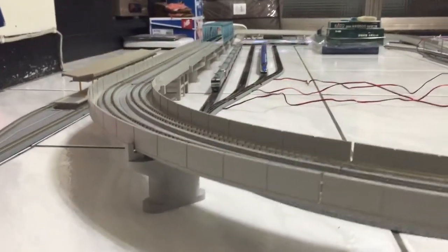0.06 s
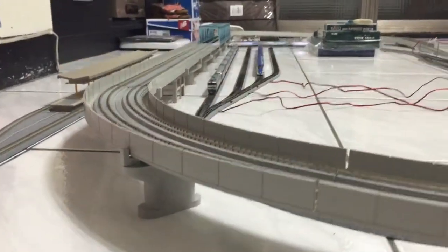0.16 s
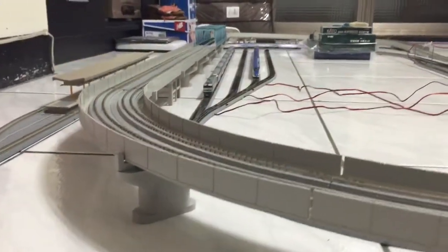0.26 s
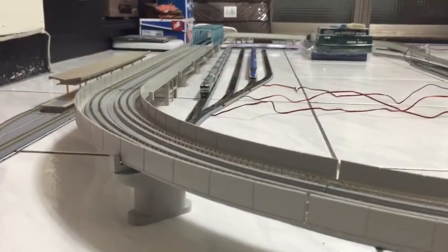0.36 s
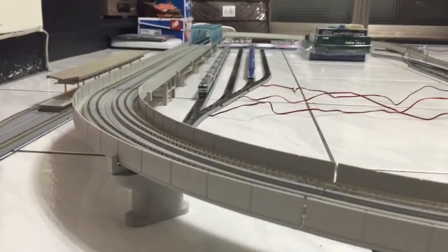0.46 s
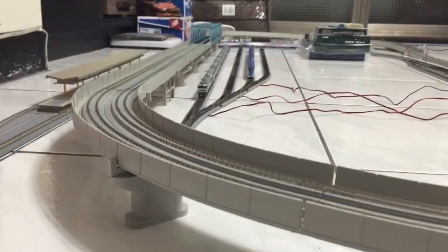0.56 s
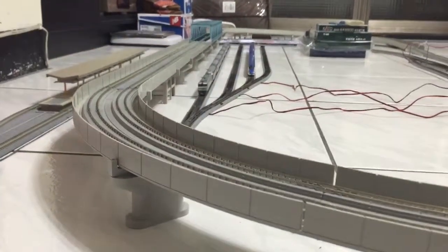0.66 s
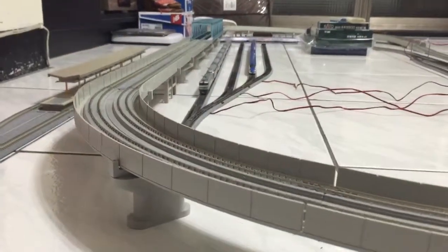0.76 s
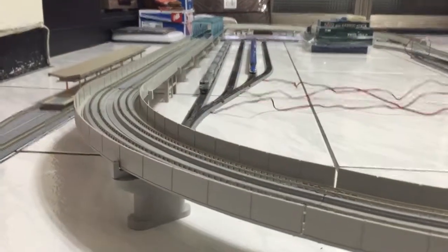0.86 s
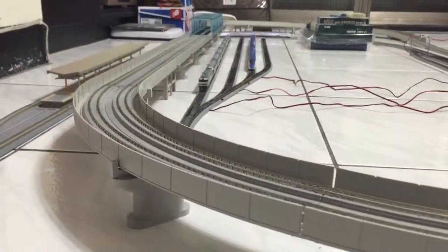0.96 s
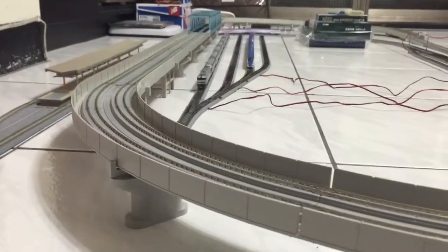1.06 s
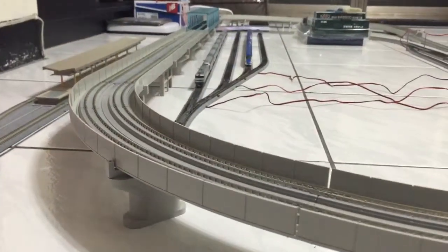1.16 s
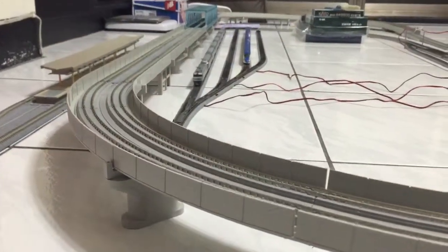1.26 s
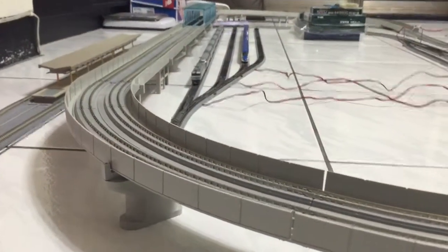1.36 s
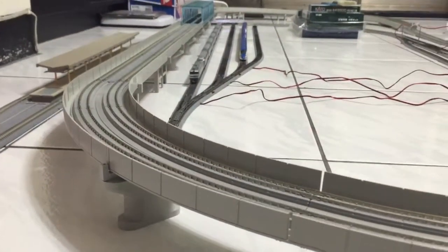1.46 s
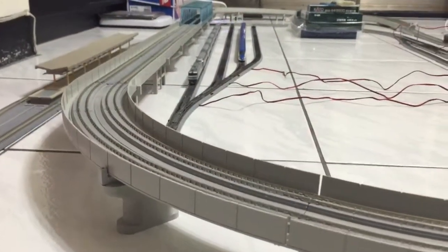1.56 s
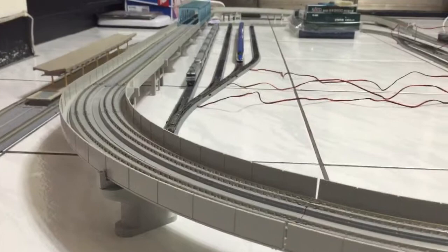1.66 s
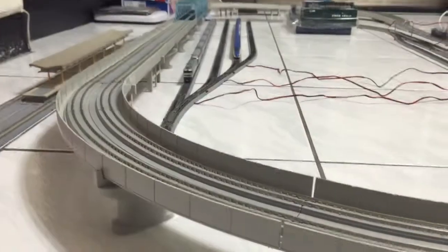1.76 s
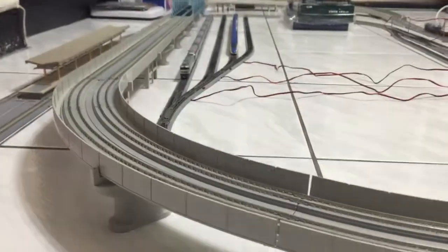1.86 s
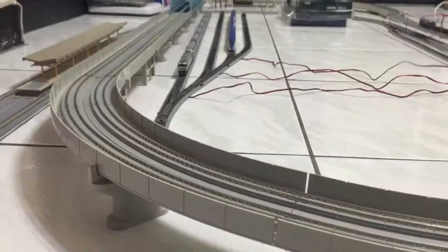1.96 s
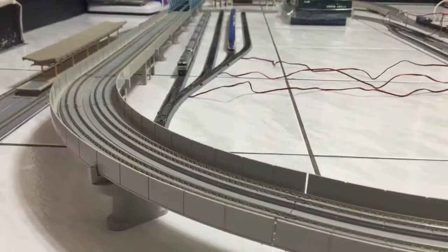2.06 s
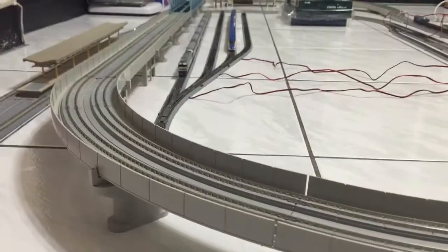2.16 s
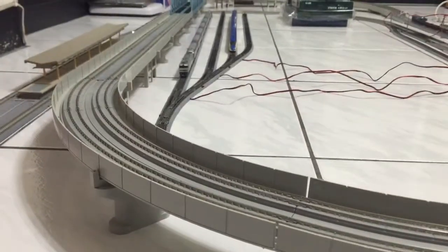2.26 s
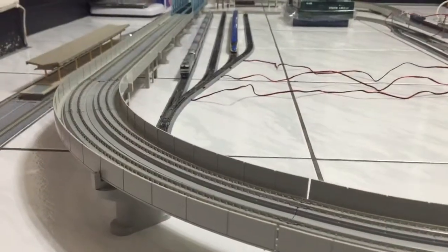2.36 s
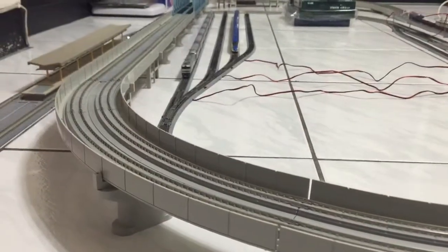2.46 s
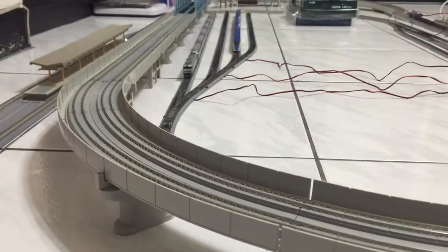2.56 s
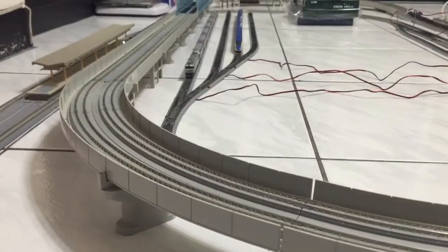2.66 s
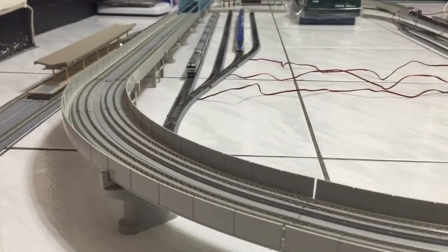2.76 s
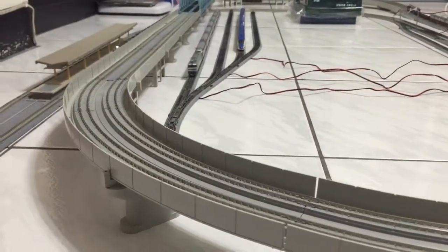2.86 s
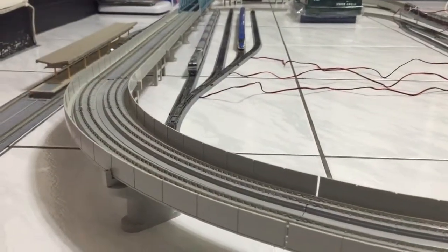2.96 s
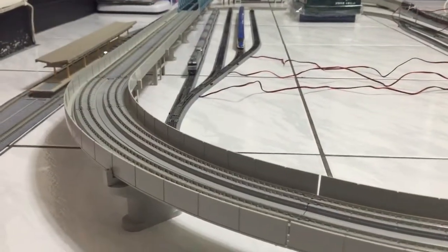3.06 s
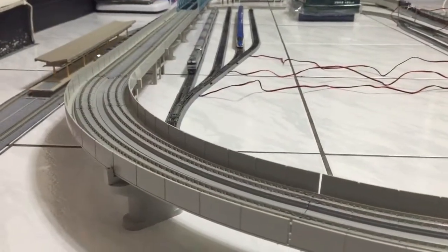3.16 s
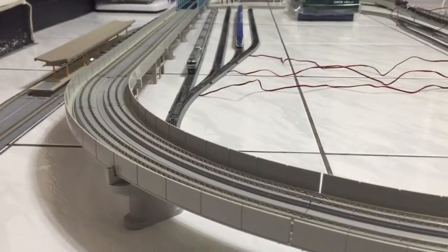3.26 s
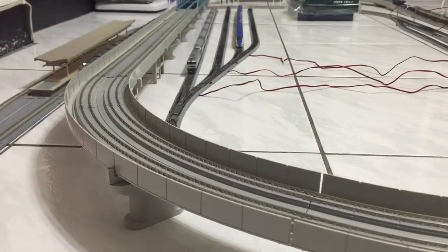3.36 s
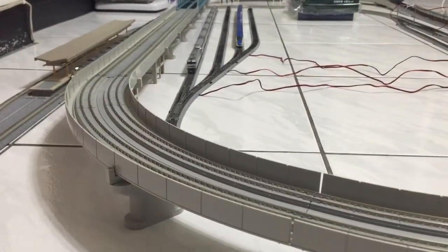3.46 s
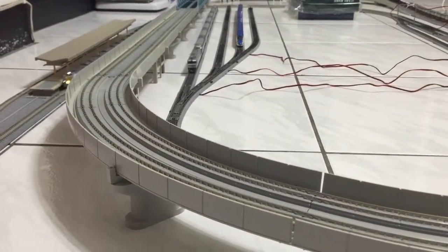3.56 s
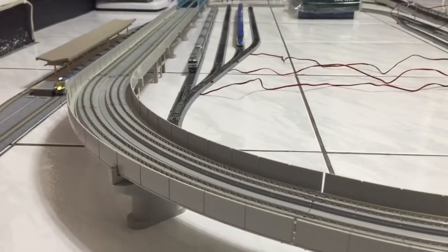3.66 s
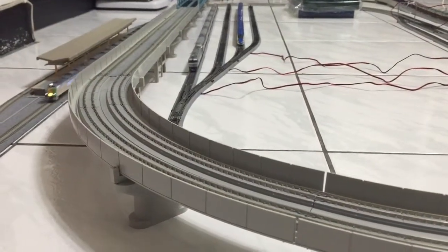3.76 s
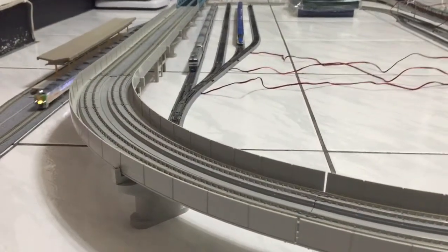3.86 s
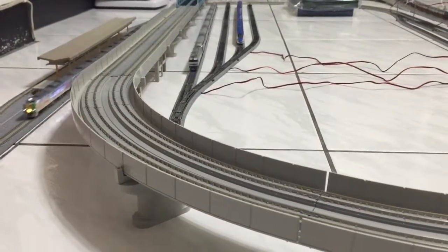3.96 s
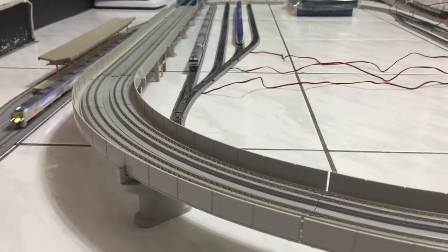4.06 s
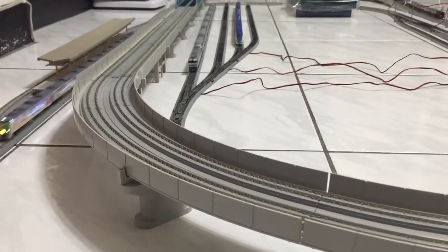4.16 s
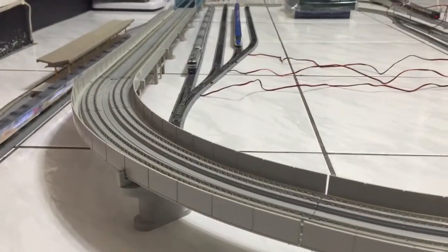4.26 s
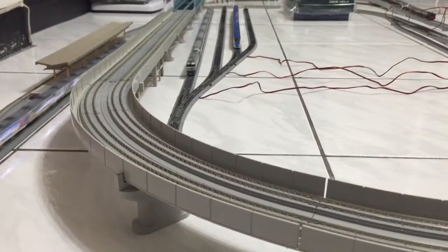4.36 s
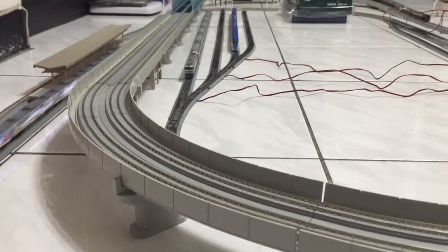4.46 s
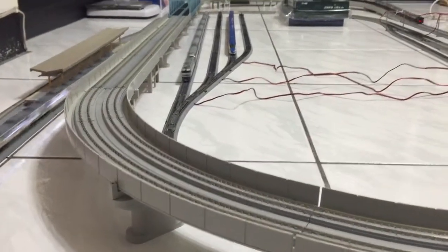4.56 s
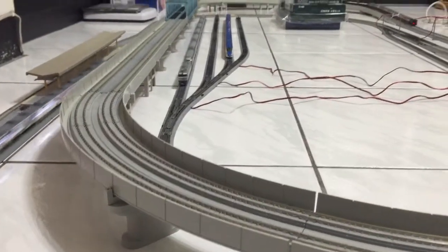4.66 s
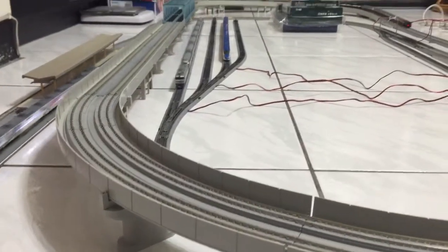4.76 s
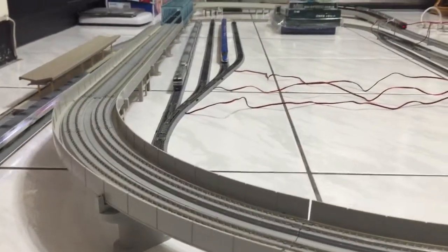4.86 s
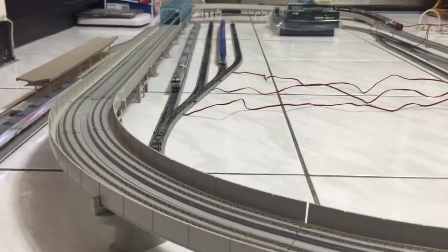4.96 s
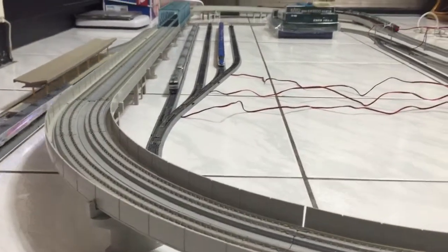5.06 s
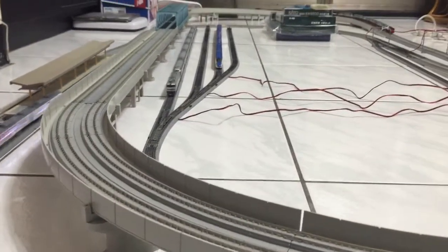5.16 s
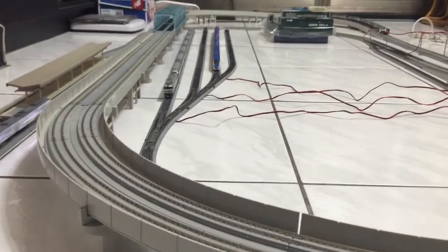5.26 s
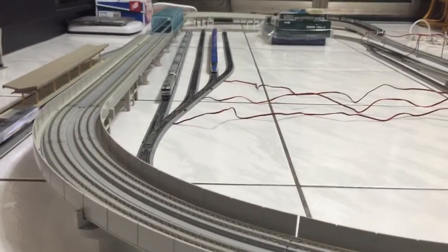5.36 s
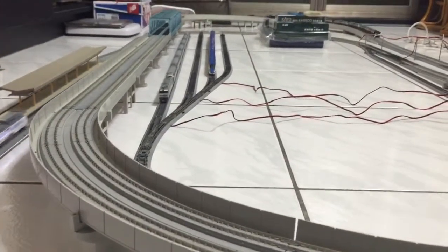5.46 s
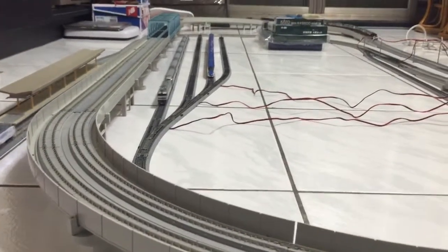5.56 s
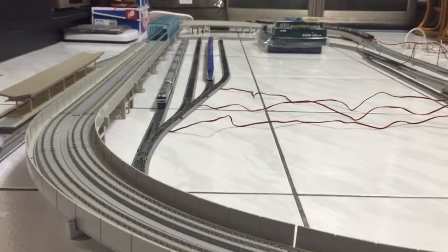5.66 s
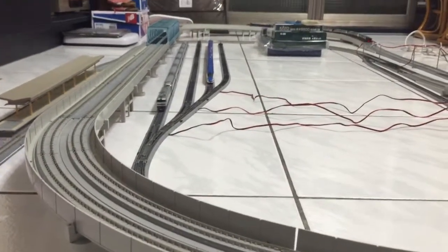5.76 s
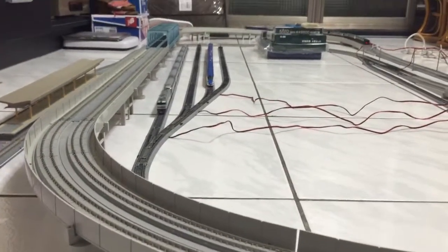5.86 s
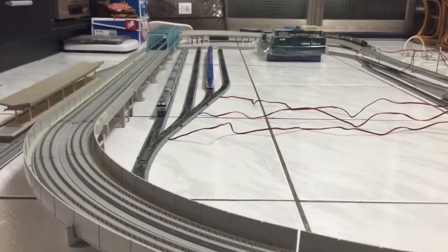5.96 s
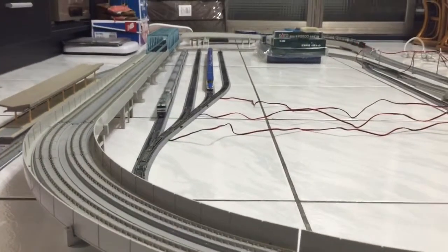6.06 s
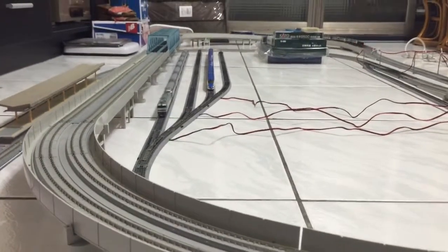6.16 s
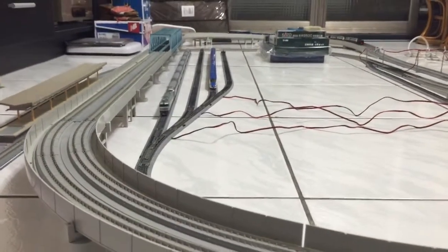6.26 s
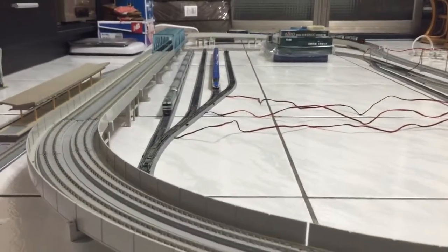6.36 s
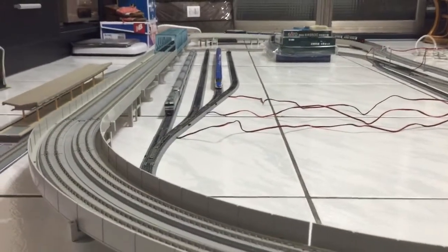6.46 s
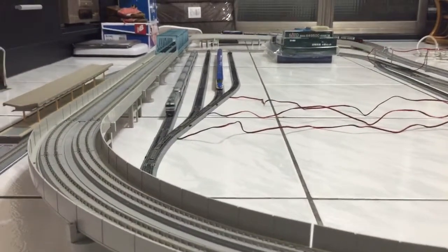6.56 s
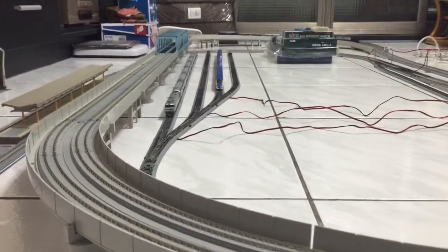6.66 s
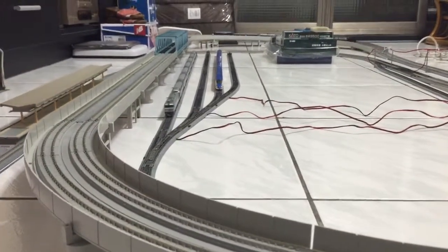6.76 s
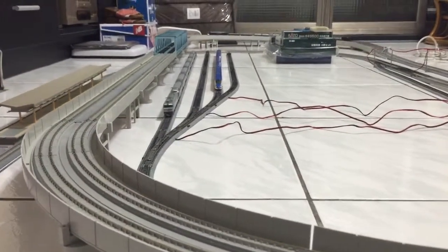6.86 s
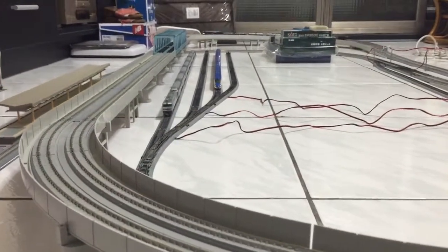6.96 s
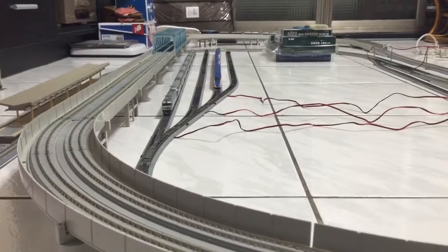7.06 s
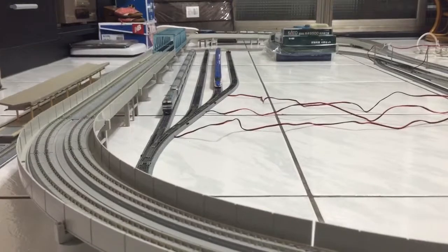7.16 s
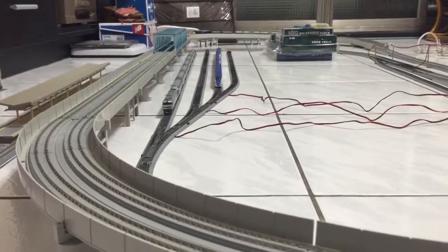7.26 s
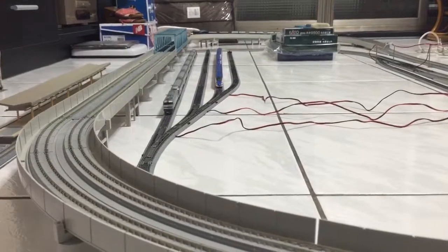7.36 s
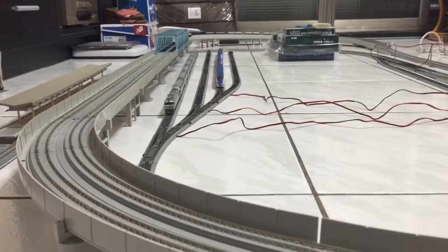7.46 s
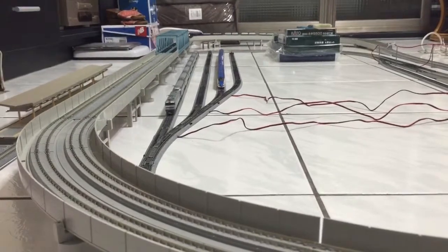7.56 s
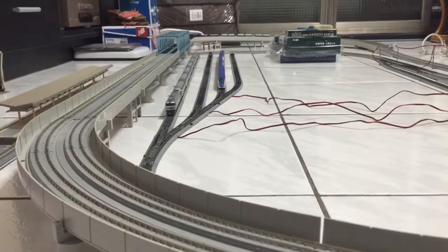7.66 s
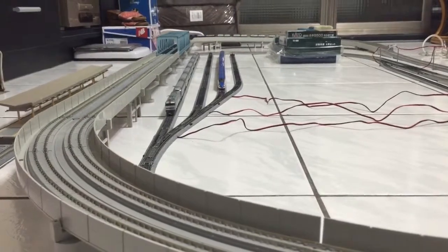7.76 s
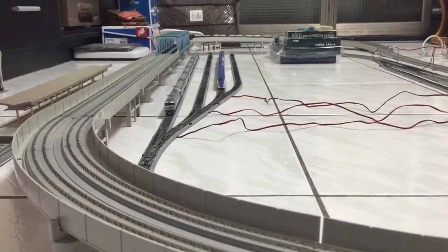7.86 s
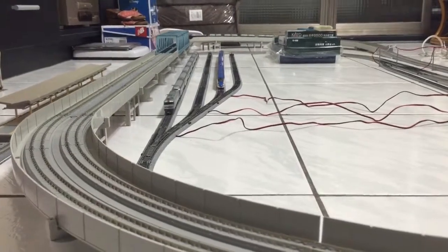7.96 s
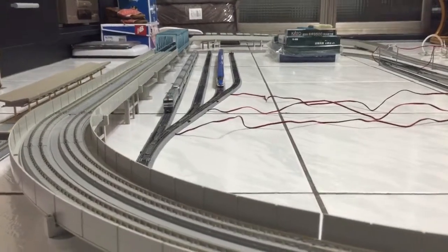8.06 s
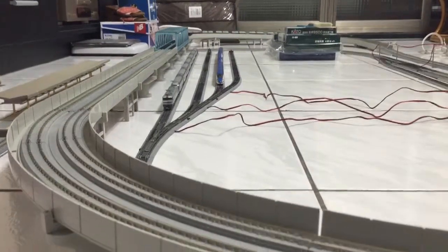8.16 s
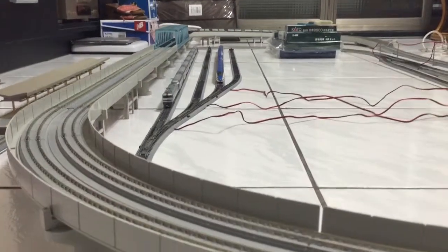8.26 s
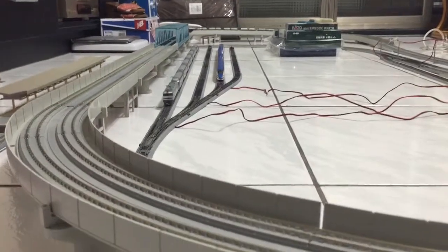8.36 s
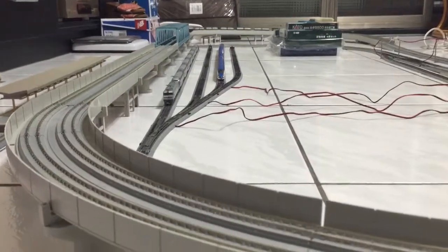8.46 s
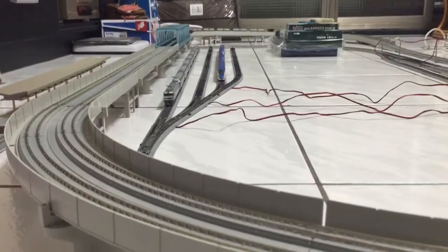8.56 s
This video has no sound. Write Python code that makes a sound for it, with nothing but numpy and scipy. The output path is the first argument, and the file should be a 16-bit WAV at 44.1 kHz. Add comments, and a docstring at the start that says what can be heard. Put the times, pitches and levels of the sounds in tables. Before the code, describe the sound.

Indoors, over a low steady hum and rumble, a model train rolls along with a fine whirring hiss and occasional clicks. Its wheels ring thinly through the bends as it grows louder. Nearest the microphone beside the track, the little cars chatter, the wheels tick crisply over joints and the plastic track pieces knock softly on the tiled floor. The sound eases slightly at the end.

```python
"""A small model train on a plastic track on a tiled floor, heard from one microphone close to the rails.
From the start a compressor hums in the room and the train runs some way off: tiny wheels patter on the
rails and ring the cars and the hollow track bed, pickups hiss, flanges sing in the curves.
From about 4 s it draws near. Around 7 s it is closest, with sharp ticks at the rail joints, rattling
cars and knocking track pieces. In the last second it starts to move off."""
import sys
import numpy as np
from scipy import signal
from scipy.fft import rfft, irfft
from scipy.io import wavfile

SR = 44100
rng = np.random.default_rng(int(sys.argv[2]) if len(sys.argv) > 2 else 0)


def waveform_to_disk(signal):
    """Save audio, clipped to [-1, 1], as 16-bit WAV at the path in sys.argv[1]."""
    frames = np.transpose(np.atleast_2d(signal))
    scaled = np.clip(frames, -1, 1) * 32767
    samples = np.round(scaled).astype(np.int16)
    wavfile.write(sys.argv[1], SR, samples)


N = 379260
TIME = np.arange(N) / SR
FREQS = np.fft.rfftfreq(N, 1 / SR)

# Levels are relative within each table; the functions set the balance between layers.
# spectra of the room's low rumble and its rush of air: f/Hz, level/dB
RUMBLE_COLOUR = [(50, -27), (78, -8), (100, -6), (122, 0.5), (138, -0.5), (152, -12.5), (168, -2.5),
                 (205, -19), (300, -21.5), (500, -42)]
AIR_COLOUR = [(20, -16), (45, -10), (70, 4), (100, -5.5), (165, -9.5), (210, -11.5), (300, -19.5),
              (550, -22.5), (1500, -26), (8000, -33.5)]
# swell of the rumble: t/s, level/dB
RUMBLE_LEVEL = [(0, -59), (.22, -65), (.38, -59), (.6, -57), (.85, -70), (1.03, -60), (1.4, -60.5),
                (2.1, -69), (2.35, -61.5), (3.1, -62), (3.75, -60.5), (4.0, -66), (4.2, -60), (4.7, -68),
                (5.3, -66), (5.7, -63.5), (6.5, -65), (7.1, -59), (8.0, -66.5), (8.5, -63)]
# compressor and fan tones: f/Hz, level/dB
HUM_TONES = [(59.2, -53.5), (86.1, -65), (120, -73), (177.8, -71), (237.2, -71.6), (296.1, -87),
             (355.3, -89), (414.5, -91), (533, -94)]
# the hum's upper tones change as the microphone moves: t/s, level/dB
HUM_UPPER = [(0, 0), (.5, -1), (.75, -5), (2.1, -4), (2.7, 1), (3.5, 1.5), (4.3, -.3), (8.6, .5)]
# the motor gathers speed, then sags under load: t/s, f/Hz, level/dB
MOTOR_WHINE = [(0, 693, -84), (.6, 724, -85), (1.4, 734, -82), (1.75, 745, -93), (2.1, 747, -81),
               (2.45, 735, -91), (2.8, 710, -84), (3.05, 705, -91), (3.4, 700, -87), (3.8, 720, -100),
               (4.4, 751, -81), (5.2, 735, -85), (5.75, 654, -82), (8.6, 625, -94)]
# cars cross a droning track piece: middle t/s, length/s, level/dB
DRONES = [(5.95, .4, -82), (7.0, 0.62, -75), (7.482, .13, -71), (8.1, 0.57, -81)]
# track pieces tip under the weight: t/s, level/dB, f/Hz
KNOCKS = [(0.071, -57, 487), (0.574, -61, 751), (1.335, -61, 740), (2.374, -59, 516), (3.372, -60, 600),
          (3.559, -62, 560), (3.922, -60, 450), (6.002, -55, 428), (6.107, -58, 650), (6.535, -55, 738),
          (6.599, -62, 430), (6.833, -56, 427), (6.87, -55, 789), (6.921, -56, 685), (7.169, -63, 600),
          (7.301, -53, 776), (7.451, -52, 743), (7.639, -60, 600), (7.668, -57, 580), (8.002, -59, 397),
          (8.154, -58, 700), (8.472, -54, 367)]
# modes of the hollow car bodies: f/Hz, t60/s, level/dB
CAR_MODES = [(943, 0.064, -7), (1070, 0.083, -2.5), (1187, 0.052, -0.5), (1323, .05, 1.5), (1450, .05, -2),
             (1610, .06, 4)]
# wheels strike rail joints: t/s, level/dB
JOINTS = [(0.1594, -31), (0.3694, -27), (1.7644, -31), (2.4094, -31), (2.7989, -29), (4.5994, -22),
          (4.9294, -24), (5.2894, -19), (6.0294, -27), (6.3094, -21), (6.6744, -17), (6.693, -20),
          (6.882, -13), (7.3014, -25), (7.3087, -12), (7.5073, -23), (7.7238, -23), (8.0054, -17),
          (8.0594, -22), (8.1214, -24)]
# cars shudder over rough spots: middle t/s, length/s, level/dB
RATTLES = [(.15, 0.046, -46), (.296, .05, -41.5), (0.365, .06, -43), (.603, .06, -44), (1.764, 0.051, -49),
           (2.42, .07, -44.5), (2.81, 0.048, -44), (3.008, 0.076, -43.5), (4.744, 0.11, -44),
           (5.11, .04, -38), (5.37, .07, -39), (5.447, 0.052, -44), (5.77, 0.1, -37.5), (5.864, .05, -40),
           (5.936, .05, -38), (6.008, .05, -37), (6.25, .05, -40), (6.311, .07, -37), (6.44, .06, -41),
           (6.676, 0.041, -33), (6.852, .08, -37), (7.144, .05, -38), (7.31, 0.027, -36), (7.45, .07, -40),
           (7.735, 0.048, -36), (7.912, 0.054, -39), (7.98, .06, -41), (8.117, .05, -41)]
# wheels and track sing in curves: middle t/s, length/s, f/Hz, half width/Hz, level/dB
FLANGE_SONG = [(.2, 0.56, 3150, 400, -51), (.37, .3, 1205, 45, -58.5), (.72, 0.67, 2715, 50, -48),
               (1.7, 0.34, 2610, 90, -44), (2.5, 2.7, 2440, 150, -45.5), (2.25, 0.92, 1630, 60, -55),
               (2.95, .5, 1636, 50, -52), (3.547, .35, 940, 35, -65), (3.6, 0.35, 2476, 70, -49),
               (4.1, .54, 6780, 169, -46), (4.51, .3, 1808, 50, -52), (4.7, 1.6, 3845, 330, -41),
               (4.73, .3, 2790, 50, -43), (4.782, 0.73, 3320, 150, -38.5), (5.1, 0.64, 6850, 190, -44.5),
               (5.0, .45, 8550, 200, -46), (5.35, 0.9, 2830, 70, -43.5), (5.76, 0.19, 1722, 50, -45),
               (5.9, .32, 2380, 130, -39.5), (6.0, .45, 1981, 50, -43), (6.2, 0.65, 3075, 130, -38),
               (6.19, 0.34, 3380, 60, -45), (6.26, 0.31, 1554, 45, -43), (6.48, .35, 947, 35, -56.5),
               (6.69, 0.32, 3020, 70, -36), (6.74, 0.27, 3180, 70, -36), (6.69, .25, 3380, 70, -39),
               (6.724, 0.29, 1593, 50, -41), (6.78, .5, 6260, 110, -44), (6.794, 0.27, 1076, 45, -51),
               (6.8, 2.3, 2350, 130, -42.5), (7.0, 0.85, 1965, 50, -43.5), (7.3, 1.5, 3075, 35, -40.5),
               (7.52, 0.62, 2200, 70, -41), (7.85, .5, 6350, 110, -50), (8.25, 1, 3770, 300, -41.5),
               (8.36, 0.37, 4349, 80, -43), (8.5, 0.56, 1190, 50, -50.5)]
# spectra of a track knock, a coupler clack, a joint tick and a rattle: f/Hz, level/dB
KNOCK_COLOUR = [(150, -14), (300, -2), (430, -6), (650, 3), (900, -10), (1600, -22)]
CLACK_COLOUR = [(600, -37), (1500, -5.5), (3200, 2), (6000, -5), (9000, -1.5), (15000, -10)]
TICK_COLOUR = [(600, -33), (1500, 4), (3000, 6), (6000, -5), (15000, -19)]
RATTLE_COLOUR = [(700, -37), (1200, -15.5), (1650, -8), (2400, 1.5), (3100, 4), (4300, -4), (5200, -7),
                 (15000, -26)]
# spectra of the rolling cars, track bed, hollow drumming and pickup hiss: f/Hz, level/dB
CARS_COLOUR = [(500, -44.5), (1200, -24), (1900, -6), (2400, -2), (3100, 0), (3700, -2), (4400, -4),
               (5200, -10), (7000, -14.5), (15000, -42)]
BED_COLOUR = [(500, -42.5), (1000, -23.5), (1280, -9), (1580, -2), (2000, -3.5), (2600, -16), (4500, -32)]
DRUM_COLOUR = [(250, -17), (430, -30), (520, -34), (690, -24), (830, -10.5), (950, -3.5), (1170, 2),
               (1400, 1), (2200, -28.5)]
HISS_COLOUR = [(2000, -34.5), (4200, 0), (5400, 0.5), (6800, -0.5), (8500, -3), (9800, -6.5), (11500, -9),
               (15300, -13)]
# highest treble of the hiss: t/s, level/dB
HISS_SHEEN = [(0, -.5), (.5, 1.2), (1.8, 2), (2.9, 1.5), (3.5, -0.5), (4.8, 1.5), (5.8, 2), (6.9, -1.5),
              (7.6, -1), (8.6, -3)]
# the train nears the microphone and moves off: t/s, cars/dB, bed/dB, drumming/dB, hiss/dB
PASS_BY = [(0.0, -40.0, -53, -68, -43), (0.35, -40.5, -56, -69, -44.0), (0.6, -41.3, -56, -62.5, -43.8),
           (1.5, -43.0, -57.5, -69.5, -43.5), (2.1, -43, -57.5, -74, -42.5), (2.7, -43.5, -53, -74, -43),
           (3.2, -43.0, -53.5, -67.5, -43), (3.7, -41.5, -48.5, -61.5, -42.5),
           (4.4, -40, -50.5, -62.5, -41), (4.9, -38, -48, -59.5, -38), (5.4, -35, -48, -59, -38),
           (5.66, -35.5, -45.5, -57, -40.5), (5.82, -34.5, -45, -56, -38.5), (6.5, -34, -45, -53.5, -38.5),
           (6.9, -34, -42.7, -53, -37.5), (7.6, -34.0, -44, -51.5, -37), (8.05, -36, -46, -53, -37.5),
           (8.28, -39, -45.5, -53.5, -38), (8.6, -38.5, -46, -54.5, -37)]
# dips in the microphone's response: f/Hz, width/Hz, level/dB
MIC_DIPS = [(4940, 300, -2), (7770, 590, -2), (10480, 320, -5)]


def undb(db):
    """Decibels to gain."""
    return 10 ** (np.asarray(db) / 20)


def unit(x):
    """Scale to rms 1."""
    return x / np.sqrt(np.mean(x ** 2))


def curves(table):
    """Each column after the time, at every sample."""
    s, *columns = np.transpose(table)
    return [np.interp(TIME, s, c) for c in columns]


def colour(x, points):
    """Filter by a spectrum of f/Hz, level/dB points."""
    hz, db = np.transpose(points)
    return irfft(rfft(x) * undb(np.interp(np.log(FREQS + 1), np.log(hz), db)), N)


def walk(rate):
    """A smooth random curve of rms 1 that changes about rate times a second."""
    return unit(irfft(rfft(rng.standard_normal(N)) * np.exp(-(FREQS / rate) ** 2), N))


def swell(middle_s, length_s):
    """A gain that rises from 0 to 1 and falls back in one arch."""
    return np.cos(np.pi * np.clip((TIME - middle_s) / length_s, -.5, .5))


def strikes(table):
    """One impulse for each t/s, level/dB row."""
    blows = np.zeros(N)
    for s, db in table:
        blows[int(s * SR)] += undb(db)
    return blows


def patter(rate, spread_db):
    """Tiny random impacts, rate a second: most weak, a few strong."""
    struck = rng.random(N) < rate / SR
    size = undb(spread_db * np.minimum(rng.exponential(size=N), 5))
    return unit(struck * size * rng.choice([-1, 1], N))


def mode(blows, hz, t60):
    """One resonance rung by blows, falling 60 dB in t60 seconds."""
    pole = np.exp((2j * np.pi * hz - np.log(1000) / t60) / SR)
    return signal.lfilter([0, pole.imag], [1, -2 * pole.real, abs(pole) ** 2], blows)


def ring(blows, t60):
    """Diffuse ringing: noise that falls 60 dB in t60 seconds after each blow."""
    keep = np.exp(-2 * np.log(1000) / (t60 * SR))
    energy = signal.lfilter([1 - keep], [1, -keep], blows ** 2)
    return np.sqrt(energy) * rng.standard_normal(N)


def struck_body(impacts, spectrum, ringing, room_db):
    """Impacts, the short ring of the plastic and the tail of the room, in the colour of the body."""
    sound = impacts + ringing * ring(impacts, t60=0.047) + undb(room_db) * ring(impacts, t60=.35)
    return unit(colour(sound, spectrum))


def wander(x, depth_db, width_hz, hold_s, size=2048):
    """The track under the moving train keeps changing, so narrow resonances come and go."""
    _, _, frames = signal.stft(x, nperseg=size)
    field = rng.standard_normal(frames.shape)
    for axis, spread in enumerate([width_hz * size / SR, hold_s * SR / (size / 2)]):
        bell = np.exp(-(np.arange(-20, 21) / spread) ** 2)  # smooths over frequency, then time
        field = signal.fftconvolve(field, np.expand_dims(bell, 1 - axis), mode="same")
    gain = unit(undb(depth_db * unit(field)))
    return signal.istft(frames * gain, nperseg=size)[1][:N]


def rumble():
    """Room tone: a low, lumpy rumble that swells and sinks."""
    db, = curves(RUMBLE_LEVEL)
    return unit(colour(rng.standard_normal(N), RUMBLE_COLOUR)) * undb(db + 1.8 * walk(12))


def compressor(upper_from_hz=200):
    """In the background, the compressor's motor and fan hum over a faint rush of air."""
    upper_db, = curves(HUM_UPPER)
    tones = 0
    for hz, db in HUM_TONES:
        level_db = db + .4 * walk(3) + upper_db * (hz > upper_from_hz)
        tones += undb(level_db) * np.sqrt(2) * np.sin(2 * np.pi * (hz * TIME + rng.random()))
    air = unit(colour(rng.standard_normal(N), AIR_COLOUR))
    return undb(0.4) * tones + undb(-64) * air


def motor(drift=0.005, flutter_db=4):
    """The train's motor whines faintly, wavering in pitch and level."""
    hz, db = curves(MOTOR_WHINE)
    phase = 2 * np.pi * np.cumsum(hz * (1 + drift * walk(2.85))) / SR
    return np.sqrt(2) * np.sin(phase) * undb(db + flutter_db * walk(11))


def track_drone():
    """One track piece resonates fitfully, shaken by the wheels while the train is on it."""
    gain = sum(undb(db) * swell(s, length) for s, length, db in DRONES)
    return gain * unit(mode(rng.standard_normal(N), hz=420, t60=.16))


def track_knocks(t60=0.11):
    """Loose track pieces knock on the tiles: a dull thud, and each rings briefly at its own pitch."""
    blows = strikes([(s, db) for s, db, hz in KNOCKS])
    decay = signal.lfilter([1], [1, -np.exp(-np.log(1000) / (t60 * SR))], blows)
    thuds = decay * unit(colour(rng.standard_normal(N), KNOCK_COLOUR))
    rings = sum(mode(strikes([(s, db)]), hz, t60) for s, db, hz in KNOCKS)
    return undb(-11.5) * thuds + undb(-5) * rings


def car_bodies():
    """The hollow cars jiggle on their bogies; each jolt rings their modes in a new mix."""
    _, _, drum_db, _ = curves(PASS_BY)
    jolts = patter(rate=70, spread_db=1)
    ringing = sum(undb(db) * mode(jolts * rng.standard_normal(N), hz, t60) for hz, t60, db in CAR_MODES)
    low_cut = signal.butter(6, 850, "highpass", fs=SR, output="sos")  # small shells give off no bass
    return unit(signal.sosfilt(low_cut, ringing)) * undb(drum_db - 2)


def clatter():
    """Loose wheels and couplers: sharp little clacks that follow the level of the rolling cars."""
    cars_db = curves(PASS_BY)[0]
    blows = patter(rate=90, spread_db=1)
    clacks = ring(blows, t60=0.0086) + 0.5 * ring(blows, t60=0.044)
    return unit(colour(clacks, CLACK_COLOUR)) * undb(cars_db - 14.5)


def rail_joints():
    """At each joint a wheel scrapes over the gap and the plastic rattles briefly."""
    blows = strikes(JOINTS)
    scrape = ring(blows, t60=0.0056)
    plastic = 1.8 * ring(blows, t60=0.051)
    return undb(4) * colour(scrape + plastic, TICK_COLOUR)


def rattles():
    """The cars shudder over rough spots: short bursts of gritty chatter."""
    bursts = sum(undb(db) * swell(s, length) for s, length, db in RATTLES)
    grit = patter(rate=1000, spread_db=2.5)
    return bursts * struck_body(grit, RATTLE_COLOUR, ringing=0.64, room_db=-15)


def flanges():
    """Rubbing flanges excite unsteady wheel resonances in the curves."""
    song = np.zeros(N)
    for s, length, hz, half_width_hz, db in FLANGE_SONG:
        friction = rng.standard_normal(N)
        on = np.abs(TIME - s) < length / 2
        band = signal.butter(2, [hz - half_width_hz, hz + half_width_hz], "bandpass", fs=SR, output="sos")
        song[on] += undb(db) * swell(s, length)[on] * unit(signal.sosfilt(band, friction[on]))
    return song * undb(-4.5 + 1.45 * walk(19))


def pickups(sheen_hz=10300):
    """The pickups slide on the rails and hiss; the highest treble slowly brightens and dulls."""
    *_, hiss_db = curves(PASS_BY)
    sheen_db, = curves(HISS_SHEEN)
    hiss = struck_body(patter(rate=11000, spread_db=2.5), HISS_COLOUR, ringing=0.49, room_db=-8.5)
    hiss *= undb(0.3 * walk(60))
    treble = irfft(rfft(hiss) * (1 - 1 / (1 + (FREQS / sheen_hz) ** 10)), N)
    hiss += (undb(sheen_db) - 1) * treble
    return wander(undb(hiss_db) * hiss, depth_db=1.56, width_hz=44, hold_s=0.059)


def wheels():
    """Wheels patter on rough rail, ringing the cars and the track bed and drumming its hollow."""
    cars_db, bed_db, drum_db, _ = curves(PASS_BY)
    cars = struck_body(patter(rate=9000, spread_db=2.5), CARS_COLOUR, ringing=0.76, room_db=-5)
    cars *= undb(cars_db + 0.39 * walk(25))
    bed = struck_body(patter(rate=7000, spread_db=3), BED_COLOUR, ringing=0.89, room_db=-9)
    bed *= undb(bed_db - 0.46 + 0.5 * walk(8.2))  # the track pieces answer unevenly
    drum = struck_body(patter(rate=3000, spread_db=2.5), DRUM_COLOUR, ringing=0.82, room_db=-13.5)
    drum *= undb(drum_db - 1.9 + 0.5 * walk(8))
    return wander(cars + bed + drum, depth_db=1.5, width_hz=21, hold_s=0.088)


def scene():
    """The room behind, the train in front; mono on both channels."""
    room = rumble() + compressor()
    track = track_drone() + track_knocks() + rail_joints()
    cars = motor() + car_bodies() + clatter() + rattles() + flanges()
    rocking = undb(0.21 * walk(28))  # the cars rock and load their wheels unevenly
    mono = room + track + cars + rocking * (pickups() + wheels())
    return np.array([mono, mono])


def record(dry, top_hz=15300):
    """The microphone has a few dips in the treble, and the recorder cuts the top."""
    dips_db = sum(db * np.exp(-((FREQS - hz) / width) ** 2) for hz, width, db in MIC_DIPS)
    heard = irfft(rfft(dry) * undb(dips_db), N)
    return signal.sosfilt(signal.ellip(12, .1, 70, top_hz, fs=SR, output="sos"), heard)


dry = scene()
out = record(dry)
waveform_to_disk(out)
```